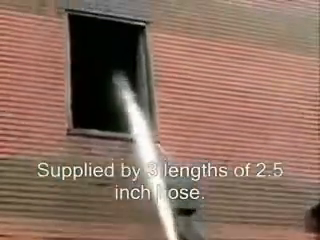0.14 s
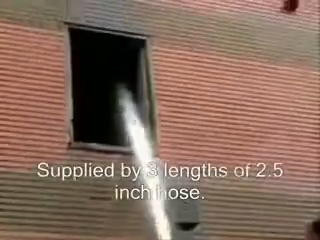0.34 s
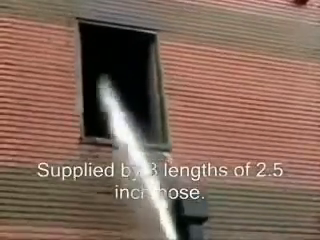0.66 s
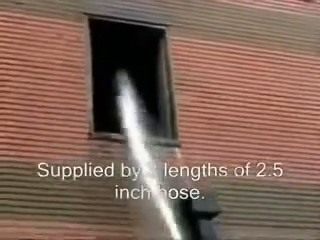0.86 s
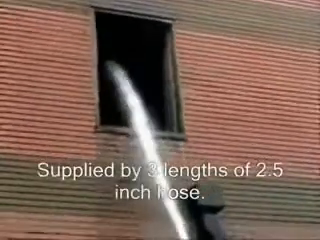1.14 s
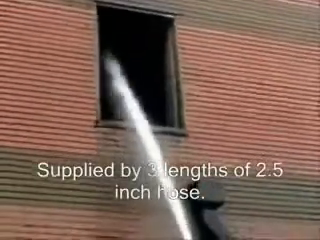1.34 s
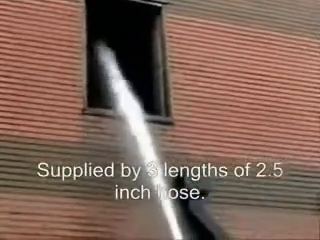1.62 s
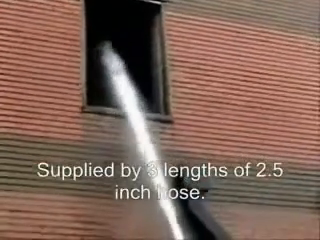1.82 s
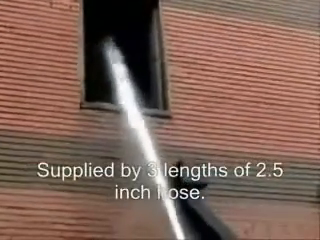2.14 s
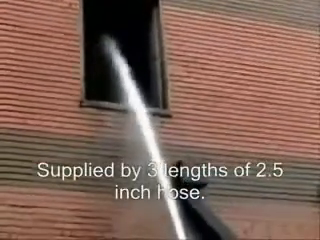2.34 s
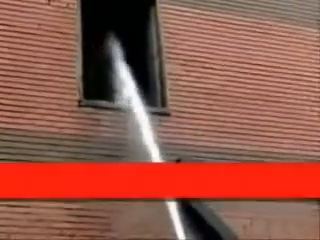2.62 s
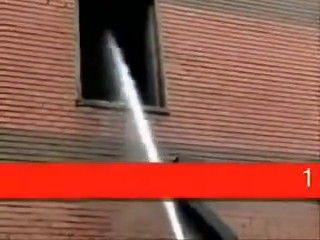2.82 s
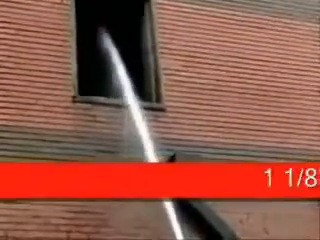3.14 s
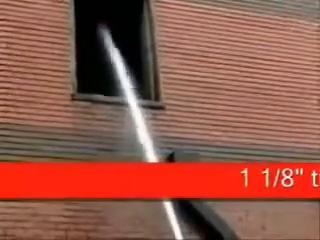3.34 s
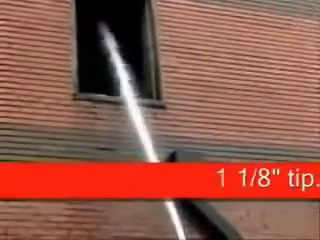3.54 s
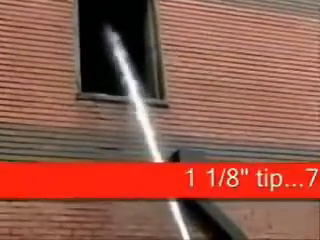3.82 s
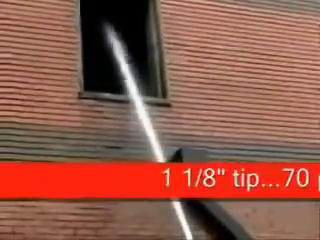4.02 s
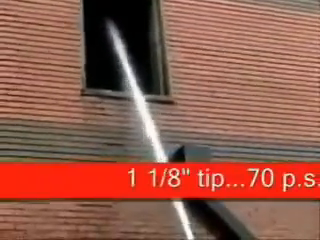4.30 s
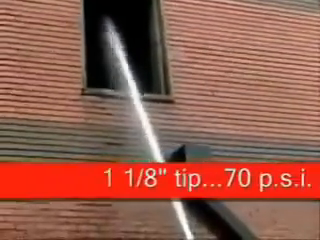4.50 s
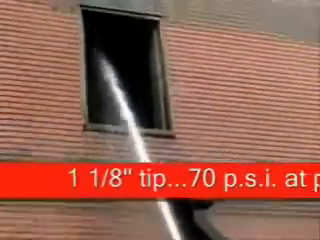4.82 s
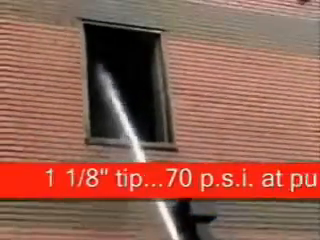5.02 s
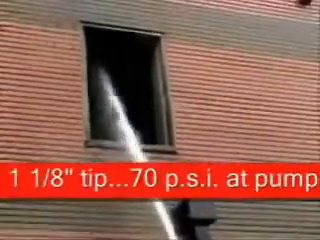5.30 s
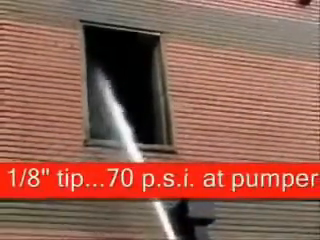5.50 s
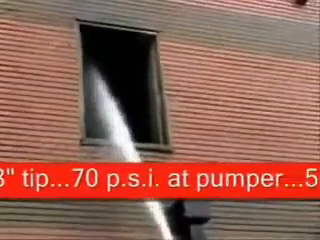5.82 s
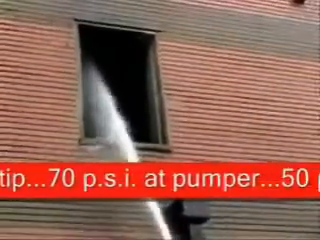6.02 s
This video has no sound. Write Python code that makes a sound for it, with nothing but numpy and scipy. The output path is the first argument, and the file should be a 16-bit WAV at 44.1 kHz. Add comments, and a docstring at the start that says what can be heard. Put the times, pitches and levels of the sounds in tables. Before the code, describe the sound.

Low, lumpy wind noise batters an unshielded stereo microphone outdoors, each gust with its own pitch, broken by tiny lulls. Ahead, a water jet hisses and crackles hard against a window frame, weakens after the first second, grows muffled, then swells again with wet slaps and spray, wavering to the end. The sound is narrow-band, without deep bass or airy top.

```python
"""Outdoors in gusty wind, microphone facing an upstairs window where a fire hose throws a solid stream.
The jet opens with a loud hiss, drops pattering, gobs splashing and slugs slapping the window frame.
Within two seconds the rush sinks; its treble dulls past three, and by four seconds it is strong again,
with more slaps; it surges whenever the stream catches the frame. All along, eddies buffet the two
microphone ports as filtered noise and short pressure swings, mostly opposed; each gust has its own pitch."""
import sys
import numpy as np
from scipy import signal
from scipy.fft import rfft, irfft
from scipy.io import wavfile
from scipy.ndimage import uniform_filter1d

SR = 44100
rng = np.random.default_rng(int(sys.argv[2]) if len(sys.argv) > 2 else 0)


def wav_out(sig):
    """Save sig, one row per channel (or a flat mono array), as 16-bit PCM at SR to the path in sys.argv[1]."""
    wavfile.write(sys.argv[1], SR, np.round(np.clip(np.atleast_2d(sig).T, -1, 1) * 32767).astype(np.int16))


N = 271215
TIME = np.arange(N) / SR
# short-time spectra: frame and hop in samples, frame times in s, bins in Hz
FRAME, HOP = 1024, 256
FRAME_S = np.arange(N // HOP + 5) * HOP / SR
BIN_HZ = np.fft.rfftfreq(FRAME, 1 / SR)

# Levels in the tables are before each layer's own level_db trim.
# steady rush of the jet, before surges and waver: time_s, level_db
JET_RUSH = [(0.0, -47), (0.37, -47.5), (0.68, -48), (0.76, -52.5), (1.2, -54.5), (1.9, -56.5),
            (2.38, -55.5), (3.3, -55), (3.62, -57), (3.69, -51.0), (4.02, -48.5), (4.61, -50),
            (4.86, -48.3), (5.39, -49.2), (6.15, -52)]
# jet creeps onto the window frame and sprays harder until it slips off:
# touch_s, length_s, boost_db, extra_treble_db (from fine mist)
FRAME_SURGES = [(.004,.245,6.5,-2.5), (0.475,.1,7.4,-2), (.88,0.074,6,-2), (1.018,0.025,8.5,-1),
                (1.52,.053,7,2), (2.71,0.074,2.5,2), (2.872,0.012,7,-7.5), (3.398,0.13,3.5,3.5),
                (4.094,.16,5,1), (4.555,0.19,3,-0.5), (4.803,.06,2,3.5), (5.58,.025,7.5,1.2),
                (5.672,0.19,4,0.5)]
SURGE_RISE_S, SURGE_FALL_S = 0.069, 0.067
SURGE_ONSET_SHARE = 0.73  # of the boost, reached as the jet first touches the frame
# colour of the hiss: frequency_hz, density_db (per Hz)
HISS_COLOUR = [(60.0, -18), (200.0, -8), (500.0, 4), (900.0, 3), (1500.0, -1.05), (2200.0, 2.1),
               (3000.0, -0.5), (3700.0, -1), (4500.0, -4.5), (5700.0, -8.5), (7000.0, -7.5), (7900.0, -15)]
# treble of the hiss against the rest, before surges and drift: time_s, treble_db
MIST_TREBLE = [(0.0, 4), (1.59, 3), (2.24, -.5), (2.43, 2.3), (2.87, 3.7), (3.32, -8.5), (3.81, -0.9),
               (4.8, -0.5), (6.15, 2)]
# left-right likeness of the hiss: frequency_hz, likeness (-1 to 1)
JET_LIKENESS = [(200, 0.98), (1000, 0.89), (2800, 0.66), (3800, 0.83), (4300, 1), (8000, 1)]
# slugs of water slap the window frame: start_s, level_db, pitch_hz, decay_s, width_octaves
FRAME_SLAPS = [(.0672,-27,3600,.003,0.83), (.111,-26,4500,.003,.8), (0.156,-32,3300,.004,.8),
               (.194,-28,3740,.003,.4), (.2114,-26,2100,0.0027,.7), (.3122,-32,2760,.003,.6),
               (0.477,-25,2500,.003,.7), (.525,-22.5,2900,.003,0.9), (.609,-28,2450,0.0036,0.61),
               (0.6678,-28,2260,0.0035,0.82), (1.0125,-36,2300,0.018,0.5), (2.412,-41.5,5030,.02,0.58),
               (4.177,-25,3100,.003,0.54), (4.2534,-30,2220,.006,0.89), (4.381,-35,2900,0.0042,.25),
               (4.577,-28,2090,.004,0.76), (4.818,-30.5,3750,.013,.2)]
# breeze at the microphone between gusts: time_s, level_db, eddy_centre_hz
BREEZE_COURSE = [(0.0, -38, 283), (0.48, -40, 237), (1.24, -36, 279), (1.49, -36, 275), (2.13, -32, 327),
                 (2.27, -35.5, 498), (2.66, -37, 477), (3.05, -35.5, 283), (3.37, -35.5, 505),
                 (4.04, -40, 318), (4.65, -38, 330.0), (4.93, -38.5, 343), (5.51, -36, 285),
                 (6.15, -33.5, 253)]
# sudden gusts on top of the breeze:
# start_s, length_s, boost_db, eddy_centre_hz, left_minus_right_db, glide_octaves (of that centre)
SUDDEN_GUSTS = [(0.247,0.06,6.5,360,2,-.3), (0.347,0.074,6,348,0,-0.074), (0.585,.104,6.3,235,-2,.1),
                (0.716,.044,6.5,290,-3.5,0.84), (0.758,0.13,7,515,1,-0.065), (0.936,0.051,7.5,446,2,0),
                (1.053,0.14,6.5,358,1.5,0.19), (1.23,0.27,2,348,2,-.4), (1.582,.057,7,388,2,0.45),
                (1.656,.04,4.5,377,-0.5,.3), (1.728,0.041,2,398,-0.5,-0.38), (1.89,0.033,5.5,300,1,-.9),
                (1.98,0.041,2.5,361,0.5,-0.7), (2.092,.033,3,250,0,0.54), (2.126,0.041,3,416,.8,0),
                (2.18,.07,4.7,424,1,-0.5), (2.392,.107,5,358,1,-0.37), (2.51,0.027,8,360,.5,-.2),
                (2.632,.036,6,510,0,-.2), (2.869,0.045,6,401,0,.3), (2.921,0.055,8,448,1.5,-0.92),
                (3.028,0.057,2.5,217,0,-0.54), (3.112,.055,4.5,390,-1,.2), (3.159,.105,2.5,384,-1,-0.34),
                (3.284,.05,3.5,253,0,-.8), (3.424,.07,5,396,-3.5,-0.82), (3.524,.088,6.5,324,1,0),
                (3.679,.185,2,349,.8,-0.092), (3.935,0.039,5,379,2.5,-0.089), (4.2,0.16,6,348,0.5,.4),
                (4.528,.075,1,367,0.5,0.4), (4.78,0.088,2.5,273,1.5,0), (4.922,0.1,3.5,335,0,0),
                (5.072,0.032,-0.5,318,2,.3), (5.152,0.085,5.5,276,1.5,0.38), (5.304,.052,5,322,2.5,0.23),
                (5.418,0.072,3,260,1.5,-0.25), (5.606,0.097,4,314,-1,-0.038), (5.882,0.11,2.5,325,0,-.3)]
# air falls still for a moment: start_s, length_s, drop_db
STILL_MOMENTS = [(0.181, 0.023, 7.5), (0.699, 0.017, 3), (0.898, 0.038, 5), (1, 0.04, 2), (1.453, .03, 2),
                 (1.772, 0.024, 4), (1.92, .028, 4), (1.965, .014, 5), (2.032, 0.06, 6.5), (2.27, .06, 2),
                 (2.36, .022, 5), (2.459, 0.022, 11), (2.544, 0.073, 2), (2.988, 0.036, 4.5),
                 (3.344, 0.022, 7), (3.627, 0.06, 5.5), (3.866, .06, 0), (4.11, 0.08, 10.5),
                 (5.29, 0.016, 10), (5.367, 0.025, 6.5), (5.531, 0.079, 9.5), (6.045, 0.026, 11)]
GUST_RISE_S, GUST_FALL_S = 0.0031, 0.0055  # time constants, also of the lulls
# eddy noise when its centre lies at USUAL_EDDY_HZ: frequency_hz, density_db (per Hz)
EDDY_COLOUR = [(20, -28), (45, -19), (80, -10.5), (130, -3.5), (220, 1.3), (350, 2), (520, -1.5),
               (780, -8.5), (1150, -14), (2000, -20.5), (3200, -26.5), (5000, -53)]
USUAL_EDDY_HZ = 350
# left-right likeness of the wind at the two ports: frequency_hz, likeness (-1 to 1)
PORT_LIKENESS = [(60, -0.97), (120, 0.22), (240, -0.34), (470, -0.49), (940, -0.5), (2000, -0.95),
                 (5000, 0.34)]
# balance of the wind: frequency_hz, left_minus_right_db
WIND_BALANCE = [(60, -0.5), (150, -1.5), (350, 0), (1000, 0.6)]
# single strong eddies: start_s, level_db, left_minus_right_db, pitch_hz, half_length_cycles,
# right_lag_cycles (right port after left)
STRONG_EDDIES = [(.281,-22,-7,399,0.76,0.29), (.679,-25,-8,351,0.46,-0.45), (.778,-30,-6,464,1.3,0.23),
                 (.853,-25,2,588,.8,0.35), (.948,-20,4,488,0.65,-.46), (1.067,-25,3,374,0.4,0.43),
                 (1.096,-23.5,1,454,.6,0.52), (1.161,-27,7,377,0.83,0.28), (1.604,-21,4,452,0.37,-0.42),
                 (1.62,-21,-1,483,0.87,-0.55), (1.954,-27,-3,360,0.36,0.63), (1.982,-22,1,460,0.92,.25),
                 (2.13,-24,6,427,0.68,0.18), (2.153,-27,12,480,0.85,0.29), (2.229,-26,-14,453,0.82,.46),
                 (2.344,-26,2,523,0.53,0.16), (2.383,-21,4,470,0.78,.25), (2.438,-25,9,368,1.8,-0.37),
                 (2.482,-24.5,1,420,0.4,.25), (2.533,-22,-11,640,0.38,0.13), (2.633,-24,1,545,0.74,.38),
                 (2.659,-25,-3,605,1.1,-0.37), (2.873,-18,1,450,0.46,-0.44), (2.941,-22.5,2,323,0.85,0.27),
                 (2.952,-24,8,449,0.74,0.34), (3.041,-27,-3,369,0.38,-.44), (3.11,-22,0,360,0.67,.5),
                 (3.146,-25,7,443,0.5,.35), (3.365,-25.5,-4,620,0.47,.25), (3.472,-23,1,345,0.38,-0.046),
                 (3.582,-26,0,411,0.64,0.66), (3.598,-27.5,-10,252,.8,0.24), (3.68,-28,-4,280,0.98,0.2),
                 (3.937,-25,-5,398,0.78,0.21), (4.208,-23.5,-7,303,0.95,-0.28),
                 (4.285,-25,-2,426,0.55,-0.48), (4.295,-23.5,-1,330,0.39,.1), (4.333,-27,4,440,0.44,-0.39),
                 (4.531,-21,-2,347,0.66,-0.35), (4.642,-18,0,569,0.56,-0.5), (5.095,-27,-7,332,.5,-0.48),
                 (5.168,-26,7,316,0.57,-0.27), (5.276,-25,-6,341,.5,-0.44), (5.301,-27,-5,310,.85,0.31),
                 (5.336,-21,0,304,.6,-.49), (5.628,-28,-8,363,0.46,-0.25), (5.926,-24,8,372,.5,0.29),
                 (6.126,-22.5,5,402,0.44,0.14)]
EDGE_HZ = 7980  # top of the microphone's band


def gain_of(db):
    """Decibels to a factor."""
    return 10 ** (np.asarray(db) / 20)


def evened(x):
    """Scales to an rms of one."""
    return x / np.sqrt(np.mean(x ** 2) + 1e-20)


def read(points, hz):
    """Reads a spectrum table on a log-frequency axis."""
    f, value = np.transpose(points)
    return np.interp(np.log(hz + 1), np.log(f + 1), value)


def follow(table, t):
    """Every column of a curve table at the times t."""
    s, *columns = np.transpose(table)
    return [np.interp(t, s, column) for column in columns]


def flutter(rate_hz):
    """A random wobble of unit rms, strongest around rate_hz."""
    hz = np.fft.rfftfreq(N, 1 / SR)
    weight = hz / rate_hz * np.exp(-hz / rate_hz)
    return evened(irfft(rfft(rng.standard_normal(N)) * weight, N))


def noise_pair(shape, likeness):
    """Two channels of noise with a moving spectrum (frames x bins) and a likeness for each bin."""
    a, b, c, d = rng.standard_normal((4, len(FRAME_S), len(BIN_HZ)))
    same = np.clip(read(likeness, BIN_HZ), -1, 1)
    common = np.sqrt(1 + same) * (a + 1j * b)
    opposed = np.sqrt(1 - same) * (c + 1j * d)
    spectra = np.array([common + opposed, common - opposed]) * shape
    _, pair = signal.istft(spectra.swapaxes(1, 2), nperseg=FRAME, noverlap=FRAME - HOP)
    return pair[:, :N]


def panned(side_db):
    """Left and right gains for a left-minus-right level difference."""
    return gain_of(np.array([side_db, -side_db]) / 2)


def surge(touch_s, length, t):
    """A surge swells until the jet touches, builds to a crest and dies back: 0 to 1."""
    corners = [touch_s - SURGE_RISE_S, touch_s, touch_s + length, touch_s + length + SURGE_FALL_S]
    return np.interp(t, corners, [0, SURGE_ONSET_SHARE, 1, 0])


def jet_db(waver_db=0.58, waver_hz=6):
    """Loudness of the water: a wavering rush, and the surges on top of it."""
    surges_db = sum(boost_db * surge(s, length, TIME) for s, length, boost_db, _ in FRAME_SURGES)
    return follow(JET_RUSH, TIME)[0] + waver_db * flutter(waver_hz) + surges_db


def hiss(water_db, level_db=4.1, patch_db=1.9, sputter_db=0.68, sputter_hz=40, mist_hz=4500,
         drift_db=.9, drift_hz=8):
    """The jet tears into spray: wide sputtering noise, its treble following the mist, which drifts in puffs."""
    mist_db = follow(MIST_TREBLE, FRAME_S)[0]
    mist_db += sum(extra_db * surge(s, length, FRAME_S) for s, length, _, extra_db in FRAME_SURGES)
    mist_db += drift_db * np.interp(FRAME_S, TIME, flutter(drift_hz))
    treble = 1 / (1 + (mist_hz / (BIN_HZ + 1)) ** 4)
    # patches: uneven density, smoothed over time and then over frequency
    patches = rng.standard_normal((len(FRAME_S), len(BIN_HZ)))
    patches = uniform_filter1d(patches, size=10, axis=0)
    patches = evened(uniform_filter1d(patches, size=10, axis=1))
    shape_db = read(HISS_COLOUR, BIN_HZ) + mist_db[:, None] * treble + patch_db * patches
    spray = noise_pair(gain_of(shape_db), JET_LIKENESS)
    sputter = gain_of(sputter_db * flutter(sputter_hz))
    return evened(spray * sputter) * gain_of(water_db + level_db)


def patter(water_db, level_db=-5.0, per_s=1300, spread_db=2.5, cycles=2.6, low_hz=1100, high_hz=7000):
    """Drops burst on the wall and sill: brief ticks of many pitches, a few much larger than the rest."""
    t, out = np.arange(256) / SR, np.zeros(N)
    pitches = np.geomspace(low_hz, high_hz, num=16)
    for hz in pitches:
        struck = rng.random(N) < per_s / len(pitches) / SR
        sizes = gain_of(spread_db * np.minimum(rng.exponential(1, N), 4))
        signs = rng.choice([-1, 1], N)
        tick = np.exp(-t * hz / cycles * 2) * np.sin(2 * np.pi * hz * t)
        out += signal.oaconvolve(struck * sizes * signs, tick)[:N]
    return evened(out) * gain_of(water_db + level_db)


def splashes(water_db, level_db=-7, spread_db=2.5, scatter_s=.006, cycles=4, chirp=0.062,
             low_hz=1300, high_hz=5200, scatter_octaves=.3):
    """Gobs of water break into clumps of droplets of like size, each a short plink that rises in pitch."""
    t, out = np.arange(768) / SR, np.zeros(N)
    gobs = rng.random((500, 3))
    drops = rng.random((len(gobs), 7, 3))  # seven droplets to a gob
    for (when, size, force), clump in zip(gobs, drops):
        gob_hz = low_hz * (high_hz / low_hz) ** size
        gob_db = -spread_db * np.log(force + .03)
        for delay, detune, strength in clump:
            turns = gob_hz * 2 ** (scatter_octaves * (2 * detune - 1)) * t
            rising = turns * (1 + chirp * np.tanh(turns / cycles / 2))
            plink = np.exp(-turns / cycles) * np.sin(2 * np.pi * rising)
            # droplets trail the gob by exponentially spread delays
            start = int(when * N - scatter_s * np.log(1 - delay) * SR)
            part = out[start:][:len(t)]
            part += strength * gain_of(gob_db) * plink[:len(part)]
    return evened(out) * gain_of(water_db + level_db)


def slaps(level_db=-9):
    """A slug of water bursts in milliseconds of bright noise, each with its own pitch and decay."""
    t, out = np.arange(4096) / SR, np.zeros(N)
    hz = np.fft.rfftfreq(len(t), 1 / SR) + 1
    for s, slap_db, centre_hz, decay_s, width_octaves in FRAME_SLAPS:
        colour = np.exp(-.5 * (np.log2(hz / centre_hz) / width_octaves) ** 2)
        noise = evened(irfft(rfft(rng.standard_normal(len(t))) * colour))
        burst = noise * np.exp(-t / decay_s)
        out[round(s * SR):][:len(t)] += gain_of(slap_db + level_db) * burst
    return out


def held(s, length):
    """A change in the air sets in abruptly, holds, and lets go a little more slowly: 0 to 1."""
    rise = (1 + np.tanh((FRAME_S - s) / GUST_RISE_S / 2)) / 2
    fall = (1 - np.tanh((FRAME_S - s - length) / GUST_FALL_S / 2)) / 2
    return rise * fall


def airflow():
    """Breeze, gusts and lulls together: force on each port in dB, and the centre of the eddy noise in Hz."""
    breeze_db, eddy_hz = follow(BREEZE_COURSE, FRAME_S)
    force_db = breeze_db - sum(drop_db * held(s, length) for s, length, drop_db in STILL_MOMENTS)
    for s, length, boost_db, gust_hz, side_db, glide in SUDDEN_GUSTS:
        grip = held(s, length)
        progress = np.clip((FRAME_S - s) / length, 0, 1)
        force_db = force_db + grip * (boost_db + side_db * np.array([[.5], [-.5]]))
        # each gust's pitch glides by its own number of octaves
        gliding_hz = gust_hz * 2 ** (glide * (progress - .5))
        eddy_hz = eddy_hz + grip * (gliding_hz - eddy_hz)
    return force_db, eddy_hz


def wind(level_db=-0.65, lump_db=1.7, lump_hz=26, port_db=1.48, port_hz=7, stretch=0.96,
         rasp=0.04, rasp_hz=900, top_hz=3600):
    """Turbulence at the ports: noise whose spectrum slides with the eddy centre, arriving in short lumps."""
    force_db, eddy_hz = airflow()
    slide = (USUAL_EDDY_HZ / eddy_hz[:, None]) ** stretch
    shape_db = read(EDDY_COLOUR, BIN_HZ * slide)
    # harder wind tears on the edges of the ports and rasps more
    excess_db = force_db.mean(0) - force_db.mean()
    shape_db += rasp * excess_db[:, None] * BIN_HZ ** 2 / (BIN_HZ ** 2 + rasp_hz ** 2)
    # the wind noise rolls off steeply above top_hz
    shape = gain_of(shape_db) / (1 + (BIN_HZ / top_hz) ** 10)
    shape /= np.linalg.norm(shape, axis=1, keepdims=True)
    balance = panned(read(WIND_BALANCE, BIN_HZ))
    air = noise_pair(shape * balance[:, None], PORT_LIKENESS)
    # quick lumps hit both ports together; slower ones swell at each port separately
    lumps = np.minimum(flutter(lump_hz), 1)
    swells = np.array([flutter(port_hz), flutter(port_hz)])
    lumpy_air = evened(air * gain_of(lump_db * lumps + port_db * swells))
    return lumpy_air * gain_of([np.interp(TIME, FRAME_S, db) + level_db for db in force_db])


def buffets(level_db=-1.5, rise_s=0.00297):
    """A strong eddy is a brief push and pull of pressure that crosses one port just before the other."""
    out = np.zeros((2, N))
    tosses = rng.random(len(STRONG_EDDIES))  # random phase, in turns
    for (s, eddy_db, side_db, hz, cycles, lag), toss in zip(STRONG_EDDIES, tosses):
        turns = hz * (TIME - s - rise_s) + lag * np.array([[.5], [-.5]])
        near = abs(turns[0]) < 7
        swell = np.exp(-.5 * (turns[:, near] / cycles) ** 2)
        blow = swell * np.sin(2 * np.pi * (turns[:, near] + toss))
        out[:, near] += gain_of(eddy_db + level_db) * panned(side_db)[:, None] * blow
    return out


def scene():
    """Water straight ahead, wind on the microphone."""
    water_db = jet_db()
    water = hiss(water_db) + patter(water_db) + splashes(water_db) + slaps()
    return water + wind() + buffets()


def record(dry):
    """The microphone's narrow band ends steeply: a linear-phase low-pass."""
    edge = signal.firwin(401, EDGE_HZ, window=("kaiser", 8), fs=SR)
    return signal.oaconvolve(dry, edge[None], "same")


dry = scene()
out = record(dry)
wav_out(out)
```